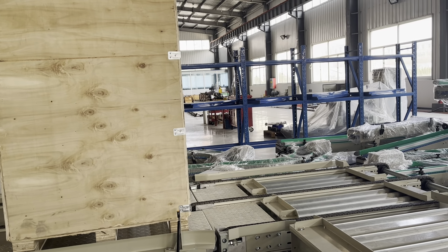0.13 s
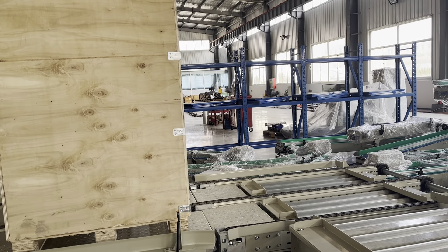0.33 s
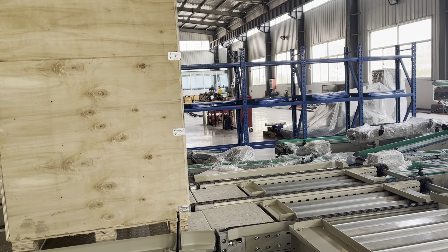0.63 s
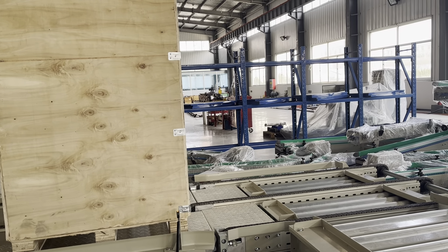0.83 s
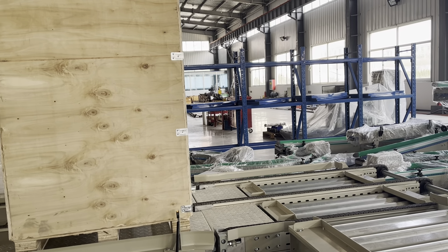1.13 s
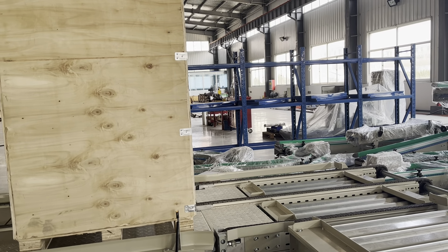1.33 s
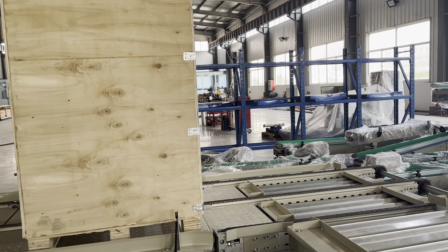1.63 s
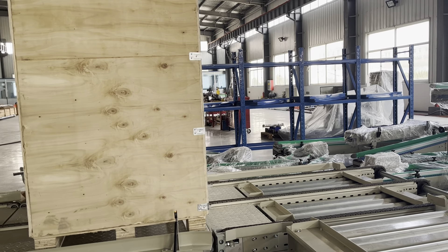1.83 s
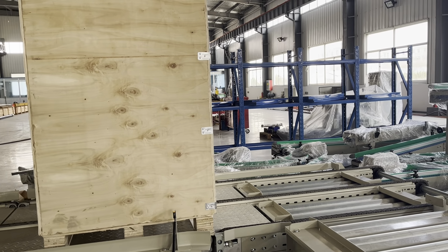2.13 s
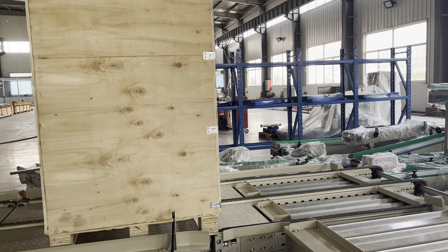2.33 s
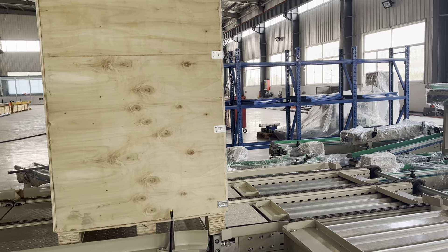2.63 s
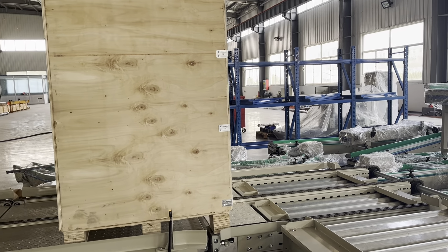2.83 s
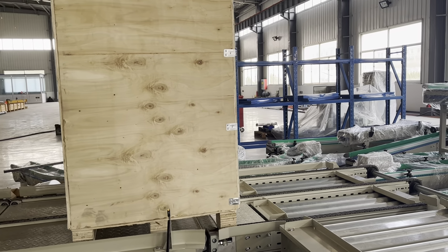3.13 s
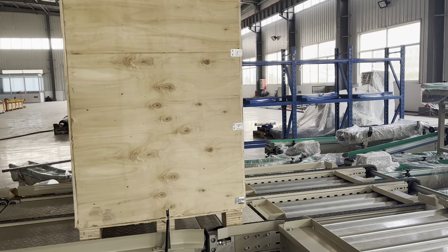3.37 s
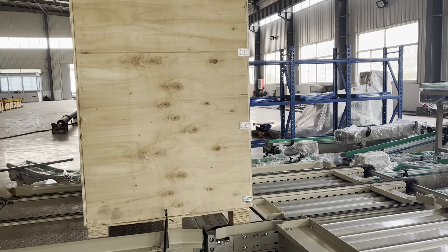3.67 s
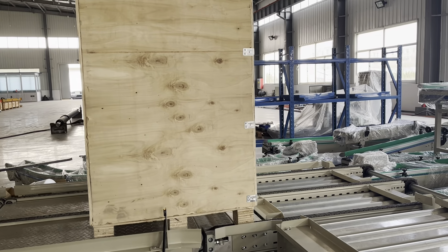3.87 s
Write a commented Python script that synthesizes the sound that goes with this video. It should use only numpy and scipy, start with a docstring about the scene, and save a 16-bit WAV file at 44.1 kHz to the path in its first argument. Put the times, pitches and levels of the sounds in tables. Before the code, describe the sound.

Distant machine rumble first, then a faint drive hiss and gliding high tones; a conveyor chain begins clanking in its steel frame, rattling between uneven blows, heard fairly near in a big reverberant factory hall.

```python
"""A chain conveyor starts up in a large factory hall and carries a wooden crate on a pallet.
Far machines hum and rumble throughout: flickering band noise and wavering sines.
The motor drive wakes with a soft hiss, then gliding tones and a narrow noise band, then a beating whine.
From 1.1 s the chain knocks in its steel frame nearly five times a second: noise bursts and decaying modes.
Between knocks the links rattle, the frame drones and gear tones waver: noise, resonators, sines."""
import sys
import numpy as np
from scipy import signal
from scipy.io import wavfile

SR = 44100
rng = np.random.default_rng(int(sys.argv[2]) if len(sys.argv) > 2 else 0)


def transcribe(signal):
    """Save signal, clipped to [-1, 1], as a 16-bit WAV file at the path in sys.argv[1]."""
    frames = np.atleast_2d(signal).T
    limited = np.clip(frames, -1, 1)
    pcm = np.round(limited * 32767).astype(np.int16)
    wavfile.write(sys.argv[1], SR, pcm)


N = 176400
TIME = np.arange(N) / SR
EDGES_HZ = np.geomspace(22, 15500, 39)
CENTRES_HZ = np.sqrt(EDGES_HZ[1:] * EDGES_HZ[:-1])

# two microphone ports: f/Hz, likeness/0-1, left minus right/dB, phase lead of left/rad
PORTS = [(60, .993, 0, 0), (130, .975, .2, .1), (250, .95, 0, .2), (700, .86, 1.3, .2), (1050, .7, -2, .5),
         (1400, .66, -2.5, .5), (2000, .64, 1, .75), (3000, .72, 5, 1), (4700, .66, 4.5, .8),
         (6300, .5, 3.5, -1.3), (8000, .8, 1, -2.7), (10000, .7, 0, -4.6), (12000, .8, 0, -5.6)]
# chain knocks: t/s, level/dB, then against that level thud/dB, clang/dB, crack/dB, tick/dB
KNOCKS = [(1.115, -6, 7.5, 8, 2.5, -1.5), (1.435, -3.5, 7, 6, 5.0, 4), (1.659, 1, -2, 0.0, -4, -6),
          (1.866, 1, 2.5, 4, -0.5, 0.5), (2.072, 3, 2, 1.5, -1.5, -4.5), (2.264, -2, 0.5, -1.5, -12, -11),
          (2.501, -11, 5, 4, 1, -6), (2.676, -6.5, 1, -5.5, -11, -5.5), (2.908, 1.5, -3.5, -1.5, -6, -21),
          (3.125, 3.5, -3.5, -2, -2.5, -11.5), (3.304, 1, -6.5, 2, 1.5, -2), (3.535, -1, 2.5, 6.5, 3, 4),
          (3.752, 0.0, 1, 0, 3.5, -6), (3.967, 2.0, -0.5, -0.5, -1.5, -4.5)]
# strongest modes of the steel frame: f/Hz, relative level/dB, t60/s
FRAME = [(165, -12, .45), (194, -8, .22), (292, -9, .25), (341, -6, .25), (377, -6, .35), (452, -1, .22),
         (528, -3, .22), (641, 0, .22), (718, -4, .16), (790, -5, .16), (875, -7, .3), (922, -1, .25),
         (974, -1, .22), (1038, -4, .22), (1302, -2, .21), (1377, -2, .22), (1444, -4, .19),
         (1640, -7, .14), (1695, -5, .16), (1836, -13, .25), (2406, -16, .2), (2643, -9, .22),
         (3400, -16, .18), (4450, -17, .18)]
# level of the running chain: t/s, level/dB
RUNNING = [(0, -92), (1.08, -70), (1.2, -40.5), (1.5, -35.5), (2.0, -33.5), (2.45, -34), (2.62, -34),
           (2.85, -35), (3.1, -33.5), (3.4, -32.5), (4, -32.5)]


def from_db(db):
    """Decibels to amplitude gain."""
    return 10 ** (np.asarray(db) / 20)


def rms_one(x):
    """Scale to rms 1."""
    return x / np.sqrt(np.mean(x ** 2) + 1e-20)


def energy_one(x):
    """Scale to the energy of one second at rms 1."""
    return rms_one(x) * np.sqrt(SR / x.shape[-1])


def at_hz(table, hz):
    """Columns of a table, interpolated on a log-frequency axis."""
    points_hz, *columns = np.transpose(table)
    return [np.interp(np.log(hz), np.log(points_hz), column) for column in columns]


def drift(rate_hz):
    """Slow noise of rms 1: white noise through two equal poles, at SR / 100."""
    pole = np.exp(-200 * np.pi * rate_hz / SR)
    white = rng.standard_normal(N // 100 + 1002)
    slow = signal.lfilter([1], [1, -2 * pole, pole ** 2], white)[1000:]  # settled part
    return np.interp(np.arange(N) / 100, np.arange(len(slow)), rms_one(slow))


def swell(t, rise_s, t60_s):
    """Envelope with exponential build-up and decay."""
    return (1 - np.exp(-t / rise_s)) * np.exp(-np.log(1000) * t / t60_s)


def gate(start_s, end_s):
    """On between two times, with 7.4 ms ramps."""
    return np.clip(np.minimum(TIME - start_s, end_s - TIME) / 0.0074, 0, 1)


def add(out, start_s, sound):
    """Mix a sound in at its time, cut at the end of the scene."""
    i = int(start_s * SR)
    out[..., i:i + sound.shape[-1]] += sound[..., :max(N - i, 0)]


def band_noise(size):
    """Quarter-octave noise bands with each band's likeness, pan and phase lead at the two ports."""
    white = rng.standard_normal((2, 2, size + SR // 4))
    for k, hz in enumerate(CENTRES_HZ):
        sos = signal.butter(2, EDGES_HZ[k:k + 2], "band", fs=SR, output="sos")
        # neighbouring bands use separate noise
        common, other = signal.sosfilt(sos, white[k % 2])[:, -size:]
        alike, pan_db, lead_rad = at_hz(PORTS, hz)
        left = rms_one(common)
        quadrature = rms_one(np.gradient(left))
        delayed = np.cos(lead_rad) * left - np.sin(lead_rad) * quadrature
        right = alike * delayed + np.sqrt(1 - alike ** 2) * rms_one(other)
        yield np.array([left * from_db(pan_db / 2), right * from_db(-pan_db / 2)])


def band_gains(spectrum):
    """Band gains for a spectrum in dB per Hz, total power 1."""
    gains = from_db(at_hz(spectrum, CENTRES_HZ)[0]) * np.sqrt(CENTRES_HZ)
    return gains / np.linalg.norm(gains)


def coloured(spectrum, flicker_db):
    """Stereo noise whose bands flicker independently."""
    out = np.zeros((2, N))
    for gain, band in zip(band_gains(spectrum), band_noise(size=N)):
        out += gain * from_db(flicker_db * drift(6.1)) * band
    return out


def hump(hz, octaves, size):
    """Stereo noise in one band, octaves to each side of its centre, rms 1."""
    edges_hz = [hz / 2 ** octaves, hz * 2 ** octaves]
    sos = signal.butter(2, edges_hz, "band", fs=SR, output="sos")
    return rms_one(signal.sosfilt(sos, rng.standard_normal((2, size))))


def tone(hz, db):
    """Wavering sine of fixed or gliding pitch with the ports' phase lead, level in dB rms."""
    waver_db = 1.5
    lead_rad = at_hz(PORTS, np.mean(hz))[2]
    phase = 2 * np.pi * np.cumsum(hz * np.ones(N)) / SR - np.array([[0], [lead_rad]])
    return from_db(db + waver_db * drift(11)) * np.sqrt(2) * np.sin(phase)


def knock_gain(knock, hz):
    """Strength of one knock at a frequency, interpolated between its registers."""
    # centres of thud, level, clang, crack, tick: f/Hz
    registers_hz = [330, 820, 1500, 3900, 11000]
    _, level_db, thud_db, clang_db, crack_db, tick_db = knock
    offsets_db = [thud_db, 0, clang_db, crack_db, tick_db]
    return from_db(level_db + np.interp(np.log(hz), np.log(registers_hz), offsets_db))


def far_machines():
    """Broadband rumble plus sines that waver in level and phase."""
    # rumble spectrum: f/Hz, density/dB per Hz (relative)
    floor_spectrum = [(24, -46), (40, -0.5), (119, 0), (160, -6.5), (410, -13), (566, -17.5), (781, -16),
                      (1000, -19.5), (1220, -24), (1310, -22.5), (4200, -36), (6900, -45.5), (8200, -26),
                      (9280, -46), (14900, -48)]
    # hum lines: f/Hz, level/dB before the common 7 dB cut
    hum_lines = [(118.4, -40.5), (398.4, -53.5), (640.6, -52), (796.7, -50.5), (1200, -54), (1879, -59.5),
                 (2051, -61.5)]
    floor_db, floor_flicker_db, hum_waver_db = -40, 2, 1.5
    out = from_db(floor_db) * coloured(floor_spectrum, floor_flicker_db)
    for hz, db in hum_lines:
        amplitude = from_db(db + hum_waver_db * drift(1.3) - 7)
        out += amplitude * np.sin(2 * np.pi * hz * TIME + 2.1 * drift(2.5))
    return out


def motor_drive():
    """Hiss, then gliding switching tones and a smeared band on run-up, then a whine of close tones."""
    # switching tones: start/s, end/s, first f/Hz, last f/Hz, level/dB rms
    switching_tones = [(0.8, 0.867, 7900, 8050, -56), (0.853, 1.07, 10780, 10700, -56),
                       (.88, 1.07, 10500, 10330, -62), (0.87, 1.07, 10550, 10900, -61),
                       (1.04, 1.48, 7900, 7200, -66), (1.048, 1.48, 7970, 7370, -59),
                       (1.376, 1.44, 10050, 10070, -56)]
    # steady whine: f/Hz, level/dB rms
    whine_tones = [(7951, -50), (8049, -49.5), (7850, -59), (7079, -64), (7350, -64), (10072, -74)]
    hiss_start_s, hiss_db, hiss_hz, hiss_octaves = 0.77, -59, 4500, 0.39
    run_up_s, run_up_db, run_up_hz, run_up_octaves = (1.05, 1.47), -55, 7750, 0.07
    whine_start_s = 1.12
    out = from_db(hiss_db) * hump(hiss_hz, hiss_octaves, size=N) * gate(hiss_start_s, np.inf)
    out += from_db(run_up_db) * hump(run_up_hz, run_up_octaves, size=N) * gate(*run_up_s)
    for start_s, end_s, first_hz, last_hz, db in switching_tones:
        glide_hz = np.interp(TIME, [start_s, end_s], [first_hz, last_hz])
        out += gate(start_s, end_s) * tone(glide_hz, db)
    whine = sum(tone(hz, db) for hz, db in whine_tones)
    return out + gate(whine_start_s, np.inf) * whine


def gearbox():
    """Gear tones waver in level and phase and follow most of the chain's swing in level."""
    # gear tones: f/Hz, level/dB rms at the chain's loudest
    gear_tones = [(165, -43), (346, -44), (376, -39.5), (873, -45), (1256, -54)]
    waver_db, wander_rad = 2, 0.45
    follows = 0.87  # share of the chain's swing in dB
    running_db = np.interp(TIME, *np.transpose(RUNNING))
    out = np.zeros(N)
    for hz, db in gear_tones:
        gear = np.sin(2 * np.pi * hz * TIME + wander_rad * drift(2))
        out += from_db(db) * rms_one(from_db(waver_db * drift(7.7)) * gear)
    return from_db(follows * (running_db - running_db.max())) * out


def chain():
    """Sliding noise pulsed by random link taps, plus frame modes as noise-driven resonators."""
    # sliding spectrum: f/Hz, density/dB per Hz (relative)
    chain_spectrum = [(25, -20), (48, 7), (90, -0.5), (135, -0.5), (175, 4), (250, -10), (370, 0.5),
                      (480, -26), (900, -8), (1400, -13), (2000, -14), (2700, -18.5), (5000, -31),
                      (7000, -42), (8600, -55), (10300, -33), (12500, -37), (14800, -78)]
    flicker_db, rattle_db, links_per_s, link_t60_s = 2, -6, 59.5, 0.11
    drone_db, drone_slope_db_per_octave = -13.5, -0.5
    taps = (rng.random(N) < links_per_s / SR) * rng.random(N)
    link_pole = np.exp(-np.log(1000) / (link_t60_s * SR))
    rattle = rms_one(signal.lfilter([1], [1, -link_pole], taps + 1e-18))
    sliding = coloured(chain_spectrum, flicker_db) * rms_one(1 + from_db(rattle_db) * rattle)
    drone = np.zeros(N)
    for hz, db, t60_s in FRAME:
        r, w = np.exp(-np.log(1000) / (t60_s * SR)), 2 * np.pi * hz / SR
        resonator = [1, -2 * r * np.cos(w), r * r]
        rubbed = signal.lfilter([np.sin(w)], resonator, rng.standard_normal(N))
        drone += from_db(db + drone_slope_db_per_octave * np.log2(hz)) * rubbed
    running = from_db(np.interp(TIME, *np.transpose(RUNNING)))
    return running * (sliding + from_db(drone_db) * rms_one(drone))


def clinks():
    """Single links tap the guide: short decaying noise bands."""
    # clinks: t/s, energy level/dB (0 dB = 1 s at rms 1), centre f/Hz
    link_taps = [(2.445, -68.5, 3000), (2.701, -54.5, 2170), (2.855, -67, 6000), (2.882, -60.5, 10500),
                 (3.506, -56, 2400), (3.849, -55, 3700)]
    t60_s, octaves = 0.14, 0.48
    out, t = np.zeros((2, N)), TIME[:SR // 4]
    for start_s, db, hz in link_taps:
        burst = hump(hz, octaves, size=len(t)) * swell(t, 0.001, t60_s)
        add(out, start_s, from_db(db) * energy_one(burst))
    return out


def knock_edges():
    """Sharp edge of each knock: a bright tick and a soft scuff at its onset, as short noise bursts."""
    offset_s, rise_s, t60_s = -0.0012, 0.00023, 0.023
    tick = (-64, 11300, 0.14)  # level/dB before knock gain, f/Hz, half width/octaves
    scuff = (-51, 1150, 1.08)
    out, t = np.zeros((2, N)), TIME[:SR // 16]
    for knock in KNOCKS:
        for db, hz, octaves in (tick, scuff):
            burst = energy_one(hump(hz, octaves, size=len(t)) * swell(t, rise_s, t60_s))
            add(out, knock[0] + offset_s, from_db(db) * knock_gain(knock, hz) * burst)
    return out


def clacks():
    """Hard clack of the link on its stop: very short modes of alternating sign."""
    # clack modes: f/Hz, relative level/dB, t60/s
    clack_modes = [(614, -1, 0.017), (838, -4.5, 0.024), (965, -2, 0.014), (1436, -15, 0.0084)]
    rise_s, clack_db, varies_db = 0.0021, -13.5, 2.5
    out, t = np.zeros((2, N)), TIME[:SR // 8]
    for knock in KNOCKS:
        for k, (hz, db, t60_s) in enumerate(clack_modes):
            lead_rad = at_hz(PORTS, hz)[2]
            phase = 2 * np.pi * hz * t - np.array([[0], [lead_rad]])
            ring = np.sin(phase) * swell(t, rise_s, t60_s)
            level = from_db(clack_db + db + varies_db * rng.standard_normal())
            add(out, knock[0], (-1) ** k * knock_gain(knock, hz) * level * ring)
    return out


def frame_modes():
    """The frame's strongest modes ring as decaying sines, each level varying from knock to knock."""
    frame_db, rise_s, varies_db, tilt_db_per_octave = -25, 0.0035, 2.5, 0.5
    out, t = np.zeros((2, N)), TIME[:SR * 2 // 3]
    for hz, db, t60_s in FRAME:
        _, pan_db, lead_rad = at_hz(PORTS, hz)
        phase = 2 * np.pi * (hz * t + rng.random()) - np.array([[0], [lead_rad]])
        pan = from_db([[pan_db / 2], [-pan_db / 2]])
        mode = np.sin(phase) * swell(t, rise_s, t60_s) * pan
        mode_db = frame_db + db + tilt_db_per_octave * np.log2(hz / FRAME[0][0])
        for knock in KNOCKS:
            level = from_db(mode_db + varies_db * rng.standard_normal())
            add(out, knock[0], knock_gain(knock, hz) * level * mode)
    return out


def knocks():
    """Dense ringing of frame and crate, partly repeated at each knock, with a noise tail for the hall."""
    # ringing spectrum: f/Hz, density/dB per Hz (relative)
    knock_spectrum = [(70, -47), (130, -14.5), (200, -0.5), (380, 0.5), (570, -7.5), (700, 1), (980, -6),
                      (1160, -8.5), (1370, 1.5), (1680, -8), (2000, -11), (2700, -11), (4600, -14.5),
                      (6200, -34), (8600, -25.5), (11000, -39.5), (14500, -44)]
    # ringing envelope: f/Hz, rise/s, t60/s
    ringing = [(150, 0.023, 0.38), (400, 0.0083, 0.3), (790, 0.001, 0.23), (1440, 0.0094, 0.31),
               (3460, 0.0053, 0.17), (6450, 0.001, 0.15), (10900, .0005, 0.078)]
    # hall reverberation: f/Hz, energy against the knock/dB, t60/s
    hall = [(150, -4, 2.4), (383, -19, 4.4), (1000, -11.5, 0.47), (3000, -15.5, 0.69), (6500, -12, 1.6),
            (12000, -38, .5)]
    knock_db, hall_build_s = -33, 0.036
    same = 0.59  # power share of the noise common to all knocks
    out, size = np.zeros((2, N)), SR // 3
    bands = band_noise(size=N + 2 * SR)
    for hz, gain, band in zip(CENTRES_HZ, band_gains(knock_spectrum), bands):
        shape = swell(TIME[:size], *at_hz(ringing, hz))
        hall_db, hall_t60_s = at_hz(hall, hz)
        tail = energy_one(swell(TIME[:SR], hall_build_s, hall_t60_s)) * from_db(hall_db)
        body = energy_one(band[:, -size:] * shape)
        hall_power = np.zeros(N)
        for knock in KNOCKS:
            strength = gain * knock_gain(knock, hz)
            i = int(knock[0] * SR) + SR
            fresh = energy_one(band[:, i:i + size] * shape)
            blow = energy_one(np.sqrt(same) * body + np.sqrt(1 - same) * fresh)
            add(out, knock[0], strength * blow)
            add(hall_power, knock[0], (strength * tail) ** 2)  # tails add in power
        out += np.sqrt(hall_power) * band[:, :N]
    return from_db(knock_db) * out


def scene():
    """Hall, drive, running chain and knocks summed."""
    background = far_machines() + motor_drive()
    running = gearbox() + chain() + clinks()
    blows = knock_edges() + clacks() + frame_modes() + knocks()
    return background + running + blows


def record(dry):
    """The microphone drops the deepest bass; the top is cut steeply."""
    low_cut_hz, cutoff_hz = 53, 14800
    high_pass = signal.butter(2, low_cut_hz, "high", fs=SR, output="sos")
    low_pass = signal.ellip(10, 0.1, 80, cutoff_hz, fs=SR, output="sos")
    return signal.sosfilt(low_pass, signal.sosfilt(high_pass, dry))


dry = scene()
out = record(dry)
transcribe(out)
```